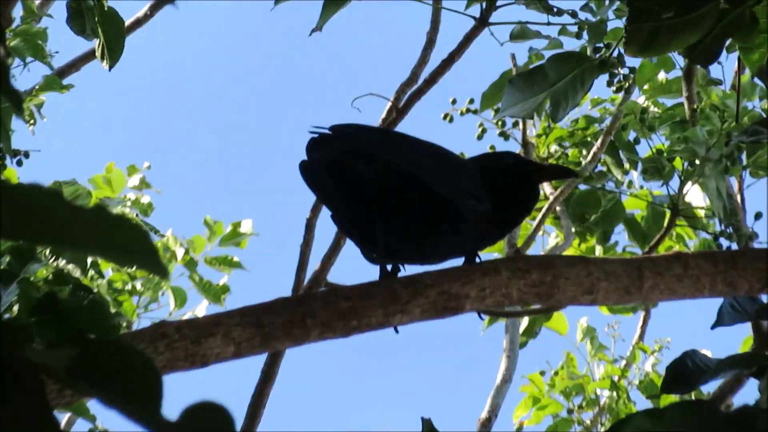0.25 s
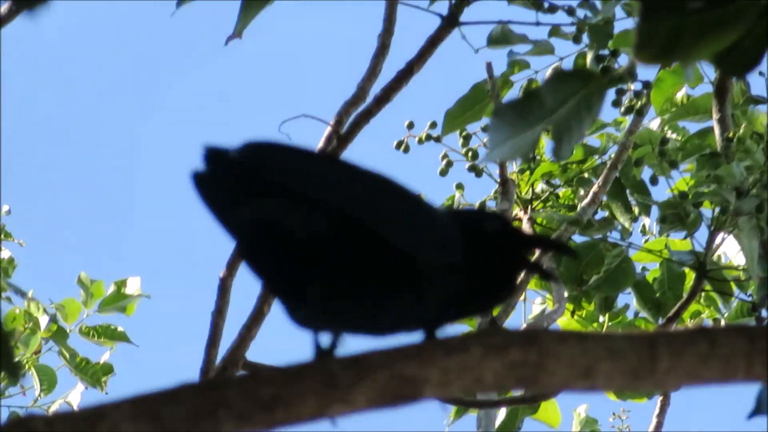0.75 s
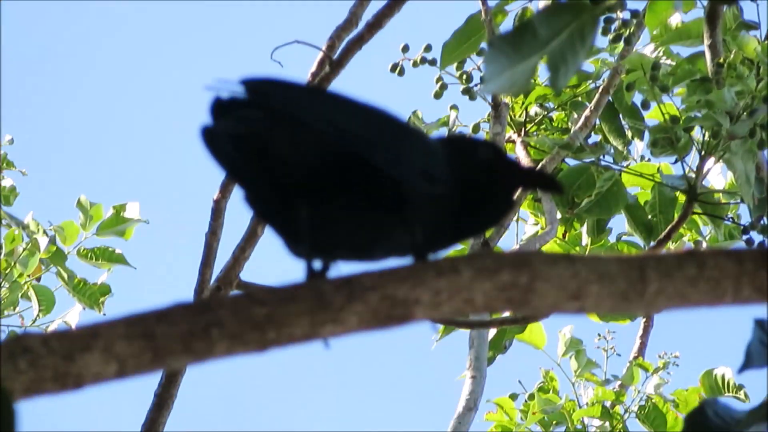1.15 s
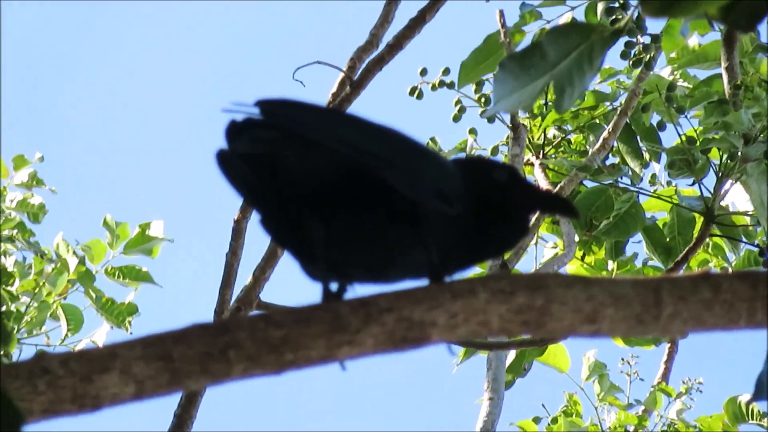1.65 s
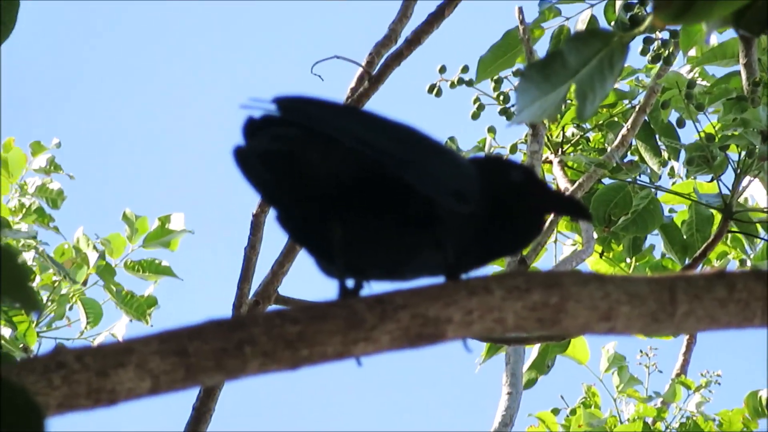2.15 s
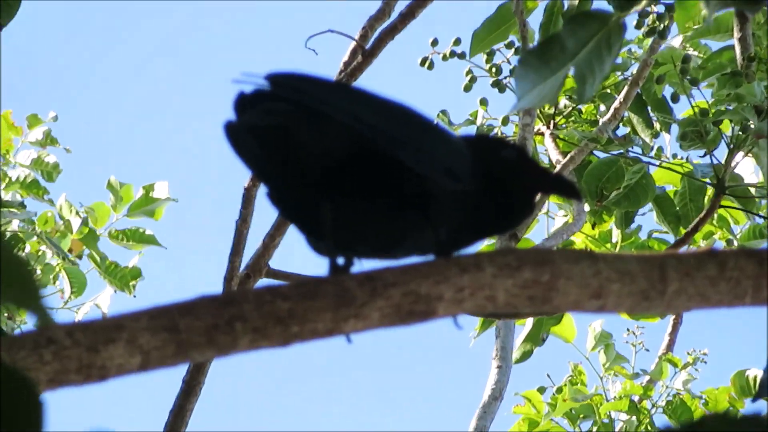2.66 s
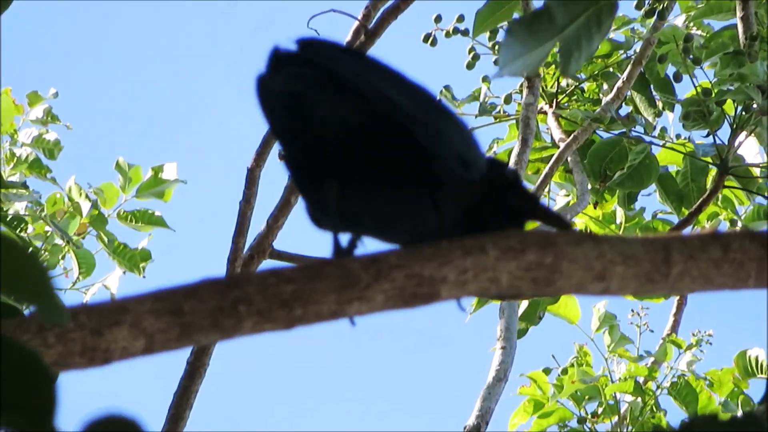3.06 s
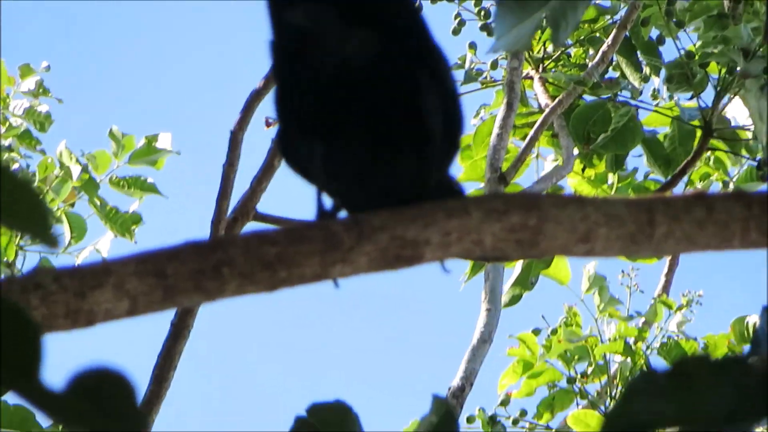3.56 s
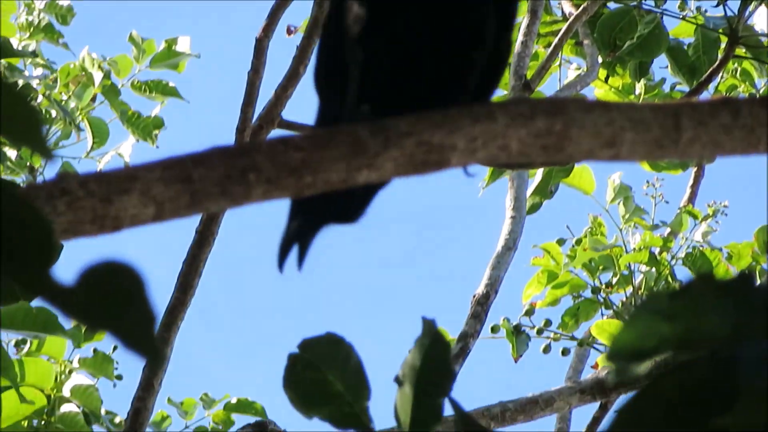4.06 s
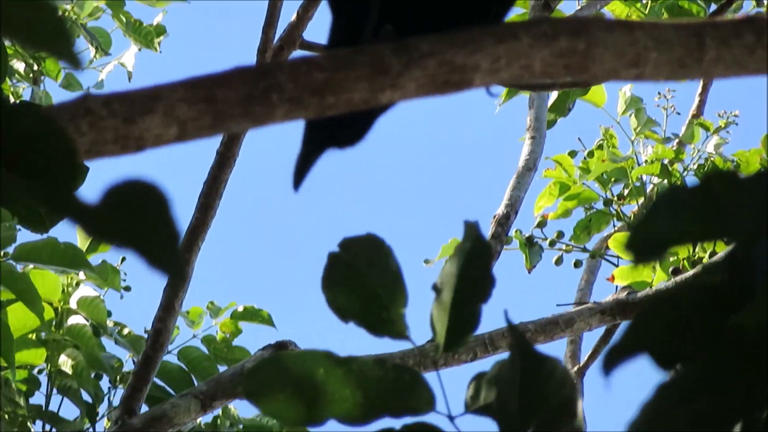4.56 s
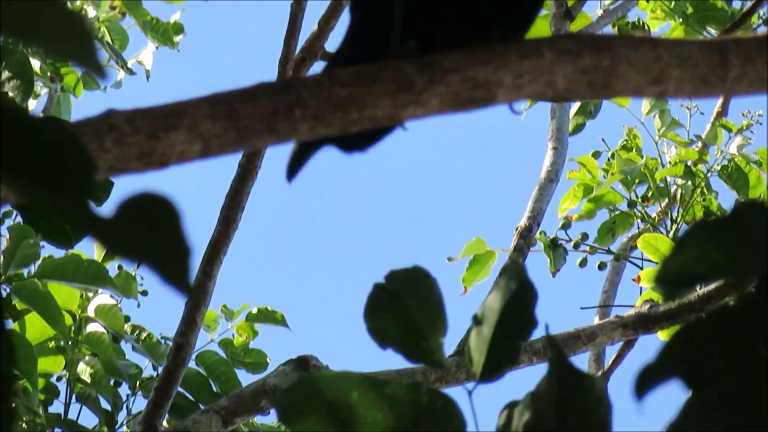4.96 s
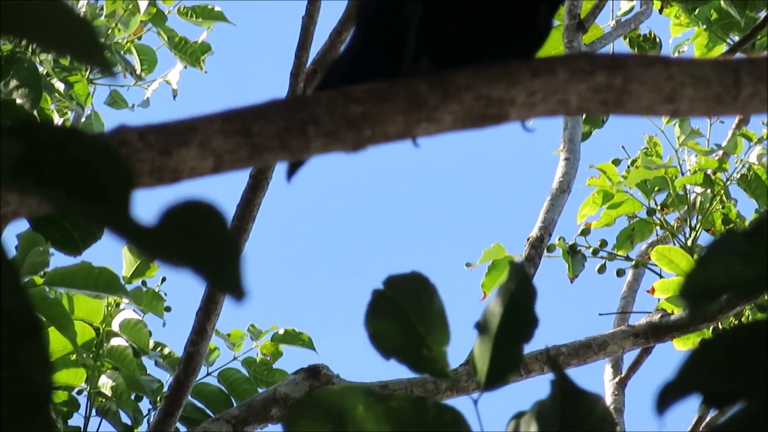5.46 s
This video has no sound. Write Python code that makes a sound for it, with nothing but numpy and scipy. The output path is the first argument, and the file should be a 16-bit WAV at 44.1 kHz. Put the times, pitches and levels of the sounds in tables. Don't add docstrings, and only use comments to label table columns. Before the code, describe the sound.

A crow overhead gives one harsh caw, then a run of five, while a small bird whistles and distant traffic washes by.

```python
import sys
import numpy as np
from scipy import signal
from scipy.io import wavfile
from scipy.ndimage import uniform_filter1d

SR = 44100
rng = np.random.default_rng(int(sys.argv[2]) if len(sys.argv) > 2 else 0)


def boost(x):
    u = np.asarray(x, float) / 20
    return 10 ** u


def dump_mix(stems):
    frames = np.atleast_2d(stems).T
    limited = np.clip(frames, -1, 1)
    pcm = np.round(limited * 32767).astype(np.int16)
    wavfile.write(sys.argv[1], SR, pcm)


N = 251370


def evened(x):
    return x / np.sqrt(np.mean(x ** 2) + 1e-20)


def read(points, hz):
    f, value = np.transpose(points)
    return np.interp(np.log(hz + 1), np.log(f + 1), value)


def add(mix, s, sound):
    part = mix[max(round(s * SR), 0):][:len(sound)]
    part += sound[:len(part)]


def resonate(x, hz, width_hz):
    turn = np.exp(2j * np.pi * np.cumsum(hz * np.ones(len(x))) / SR)
    r = np.exp(-np.pi * width_hz / SR)
    return 2 * (turn * signal.lfilter([1 - r], [1, -r], x / turn + 1e-18)).real


def wander(count, size):
    return evened(uniform_filter1d(uniform_filter1d(rng.standard_normal(count), size), size))


# (f/Hz, level/dB per Hz)
ROAD_COLOUR = [(15, -38), (25, -7.5), (59, -8.5), (107, -3.5), (209, -5.5), (322, -12), (445, -11),
               (582, -18.5), (919, -18.5), (1080, -21.5), (1270, -22.5), (3260, -29), (6730, -35.5),
               (15500, -49)]
# (t/s, level/dB)
ROAD_PASSING = [(0.0, -66), (0.63, -67.5), (0.83, -65.5), (1.3, -57.5), (1.7, -59), (2.2, -59), (2.55, -59),
                (3.0, -57), (4.2, -57), (5.7, -55.5)]
# (f/Hz, likeness/-1 to 1)
ROAD_LIKENESS = [(60, 0.97), (130, 1), (290, 0.82), (640, 0.67), (1410, 0.61), (3100, 0.17), (6820, 0.14),
                 (15000, -0.38)]


def traffic():
    frames, hz = N // 256 + 5, np.fft.rfftfreq(1024, 1 / SR)
    a, b, c, d, patches = rng.standard_normal((frames, 513, 5)).T
    patches = evened(uniform_filter1d(uniform_filter1d(patches, 10, 0), 14, 1))
    s, road_db = np.transpose(ROAD_PASSING)
    road_db = np.interp(np.arange(frames) * 256 / SR, s, road_db - road_db.mean())
    hum_db = 1.35 * wander(frames, size=40) + 2 * np.linspace(1, -1, frames)
    road_share = read([(480, 0), (560, 0.92), (2500, 0.53), (8000, 0.37)], hz)[:, None]
    hum_share = read([(120, 0.23), (260, 0.62), (480, 0.4), (560, 0.6)], hz)[:, None]
    same = np.clip(read(ROAD_LIKENESS, hz), -1, 1)[:, None]
    left = a + 1j * b
    right = same * left + np.sqrt(1 - same ** 2) * (c + 1j * d)
    level_db = read(ROAD_COLOUR, hz)[:, None] + 0.94 * patches
    level_db = level_db + road_share * road_db + hum_share * hum_db
    z = np.array([left, right]) * boost(level_db)
    return boost(-43.5) * evened(signal.istft(z, nperseg=1024, noverlap=768)[1][:, :N])


# (t/s, peak level/dB, f/Hz, length/cycles)
HAND_THUMPS = [(0.039, -41, 43, 1.1), (0.299, -56, 110, 2.1), (0.569, -34.5, 118, 1.7),
               (0.729, -49, 62, 0.93), (1.078, -45, 75, 1.1), (1.348, -35, 43, 0.95),
               (1.489, -28, 120.7, 0.44), (1.811, -41, 70, 2), (1.919, -39, 35.5, 0.93),
               (2.238, -37, 41, 0.99), (2.319, -34.5, 67.4, 1.3), (2.399, -28.5, 54, 1.56),
               (2.689, -28, 85, 2.1), (2.734, -28.5, 58.5, 1.1), (2.779, -34, 70, 0.77),
               (2.888, -32.5, 66.6, 0.99), (3.07, -29.5, 48.7, 1.37), (3.328, -31.5, 47.8, 1.56),
               (3.509, -32.5, 50.4, 1), (3.6, -33.5, 64, 0.7), (3.949, -38, 38, 1.01),
               (4.399, -46, 38, 1.01), (4.798, -45, 89, 1.01), (5.27, -42.5, 26.7, 0.84),
               (5.409, -36, 30, 0.57)]


def hand_thumps():
    hand = np.zeros(N)
    for s, db, hz, cycles in HAND_THUMPS:
        t = np.arange(0, 2 * max(cycles, .5) / hz, 1 / SR)
        add(hand, s - .005, boost(db) * np.sin(2 * np.pi * hz * t) * np.hanning(len(t)))
    tilt = 0.2 * wander(N, size=9000)
    return hand + tilt * np.roll(hand, 110) * [[1], [-1]]


# (swell level/dB, swell t/s, droop level/dB, release level/dB)
EFFORT_BY_POSE = [(-15, 0.098, -4, -4), (-14, 0.083, -4.5, -6), (-11, 0.082, 1.5, -12),
                  (-12, 0.071, -2, -9)]
# (first shut f/Hz, first open f/Hz, closing share/0-1, second shut f/Hz, second open f/Hz)
THROAT_BY_POSE = [(1036, 1267, 0.18, 1826, 1983), (1021, 1252, 0.12, 1790, 2037),
                  (1054, 1166, 0.56, 1610, 1778), (1072, 1212, 1, 1580, 1707)]
GRIT_BY_POSE = [(.3, -0.081, 0.06, 0.1), (.22, .22, 0.06, 0.53), (0.31, 0.13, 0.22, 0.32),
                (.25, .22, 0.16, .35)]
# (rasp level/dB, early rasp level/dB, late rasp level/dB, breath level/dB, early breath level/dB)
TREBLE_BY_POSE = [(-10, -6.5, -10.5, -38, -10), (-11, 2, -16, -34, 20), (-11, -1, -11, -34.5, 19),
                  (-12, -3, -10, -31.5, 12.5)]


def gesture(pose, start, length, peak_db, top_hz, last_hz):
    start_hz, rise_s, rise_curve, sag_from = 148.34, .115, 1.5, .62
    snap_db, snap_s, release_s = -15, 0.0087, .035
    t = np.linspace(0, length, 40)
    rise = np.sin(np.pi / 2 * np.minimum(t / rise_s, 1)) ** rise_curve
    sag = np.clip((t / length - sag_from) / (1 - sag_from), 0, 1) ** 1.5
    late = np.sqrt(sag)

    swell_db, swell_s, droop_db, release_db = EFFORT_BY_POSE[pose]
    effort_db = peak_db + snap_db * np.exp(-t / snap_s)
    effort_db += swell_db * np.maximum(1 - t / swell_s, 0) ** 1.6
    effort_db += droop_db * sag + release_db * np.maximum(1 - (length - t) / release_s, 0)
    hz = start_hz + (top_hz - start_hz) * rise + (last_hz - top_hz) * sag

    low_shut, low_open, closes, mid_shut, mid_open = THROAT_BY_POSE[pose]
    low_hz = low_shut + (low_open - low_shut) * (rise - closes * sag)
    mid_hz = mid_shut + (mid_open - mid_shut) * (rise - sag)
    hoarse, late_hoarse, double, late_double = GRIT_BY_POSE[pose]
    hoarse = hoarse + late_hoarse * late
    double = double + late_double * late
    rasp_db, early_rasp_db, late_rasp_db, breath_db, early_breath_db = TREBLE_BY_POSE[pose]
    rasp_db = rasp_db + early_rasp_db * (1 - rise) + late_rasp_db * sag
    breath_db = breath_db + early_breath_db * (1 - rise) ** 2
    return np.transpose([start + t, effort_db, hz, low_hz, mid_hz, hoarse, double, rasp_db, breath_db])


def steep(x, hz, width_hz):
    return resonate(resonate(x, hz, 1.44 * width_hz), hz, 1.43 * width_hz)


def steady(x):
    return x / np.sqrt(uniform_filter1d(x ** 2, 2500) + 1e-9)


# (f/Hz, width f/Hz, level/dB)
SHUT_BEAK = [(3560, 220, -12.5), (6540, 230, -25.5), (9240, 290, -25)]


def caw(rows, balance, upper, air_bands):
    s, *columns = np.transpose(rows)
    t = np.arange(s[0], s[-1], 1 / SR)
    effort_db, hz, low_hz, mid_hz, hoarse, double, rasp_db, breath_db = (np.interp(t, s, c) for c in columns)
    mid_db, chest_db, body_db, fill_db, hiss, notch_hz, low_width_hz, mid_width_hz, held = balance
    hoarse, double = np.clip(hoarse, 0, 1), np.clip(double, 0, .9)

    turns = np.cumsum(hz * (1 + .05 * hoarse * wander(len(t), size=120))) / SR
    beat = turns + .08 * double * np.sin(np.pi * turns)
    cycle = (beat + .5).astype(int)
    uneven = np.clip(rng.standard_normal(200), -2.5, 1.3)[cycle]
    strength = boost(4 * hoarse * uneven) * (1 + double * (-1.) ** cycle)
    pulses = sum(np.cos(2 * np.pi * k * beat) for k in range(1, 68))
    puffs = (.2 + np.exp(-(beat % 1) / .35)) * rng.standard_normal(len(t))
    clear = strength * evened(pulses)
    air = strength ** 0.14 * evened(puffs)
    low = clear + .7 * hoarse * air
    high = clear + hiss * (1 + 2 * hoarse) * air

    mid_gain = boost(mid_db + 0.25 * (effort_db - effort_db.max()))
    voice = steep(low, low_hz, low_width_hz) - mid_gain * steep(low, mid_hz, mid_width_hz)
    voice += boost(body_db) * steep(low, (low_hz + mid_hz) / 2, 180)

    ladder = 0
    for k in range(2, 6):
        partial_db = 5.5 * wander(len(t), size=700) - 2 * k * (hz / hz.max()) ** 4
        ladder = ladder + boost(partial_db) * np.cos(2 * np.pi * k * turns)
    ladder = evened(ladder) * strength ** .5 * (1 - double) ** 1.36
    voice += boost(chest_db) * steep(0.44 * ladder + 0.23 * clear, 928, 734)

    beak = (low_hz / low_hz.max()) ** 0.62
    top = sum((-1) ** k * boost(db) * steep(high, f * beak, w) for k, (f, w, db) in enumerate(upper))
    top += boost(fill_db) * steep(high, 2130, 1920)
    top -= resonate(top, np.linspace(1.03, .98, len(t)) * notch_hz, 330)
    shut = np.clip(held, 0, 1) / (1 + np.exp((t - t[0] - .065) / 0.0069))
    shut_top = sum(boost(db) * steep(high, f, w) for f, w, db in SHUT_BEAK)
    top = (1 - shut) * top + shut * shut_top

    breath = sum(boost(db) * steep(air + 0.079 * clear, f, w) for f, w, db in air_bands)
    voice = steady(voice) + boost(rasp_db) * steady(top)
    voice += boost(breath_db - 4.5) * steady(breath)
    return s[0], boost(effort_db - 1.5) * voice * signal.windows.tukey(len(t), .1)


# (t/s, length t/s, effort level/dB, top pulse f/Hz, last pulse f/Hz)
CAW_CALLS = [
    (0.816, 0.19, -23, 206.5, 176.6),
    (2.95, 0.2, -24.5, 218.7, 197.3),
    (3.512, .187, -24, 219, 177.4),
    (4.071, 0.19, -22.5, 217.5, 181.4),
    (4.475, .195, -21, 227.7, 204.7),
    (4.903, .194, -21, 227.8, 204.4),
]
HEAD_POSE = [
    0,
    1,
    1,
    2,
    3,
    3,
]
# (second resonance level/dB, chest level/dB, body level/dB, broad fill level/dB, hiss share/0-1)
BALANCE_BY_POSE = [
    (2, -20, -11, -24, 0.95),
    (-4.5, -21, -13.5, -25, 0.83),
    (-3.5, -18.5, -10.5, -27.5, 0.97),
    (-3.5, -20.5, -14, -27.5, 0.73),
]
# (notch f/Hz, first low width f/Hz, second low width f/Hz, treble held back/0-1)
BEAK_BY_POSE = [
    (6560, 215, 136, 0.75),
    (6450, 209, 230, 0.22),
    (6870, 170, 184, .05),
    (7150, 178, 177, .2),
]
# (f/Hz, width f/Hz, level/dB)
UPPER_BY_CAW = [
    [(3680, 160, -15.5), (4250, 490, -15.5), (5280, 420, -20), (7140, 510, -20.5), (8540, 980, -29)],
    [(3320, 260, -27), (3730, 120, -17), (4190, 320, -12.5), (5500, 570, -23.5), (7250, 730, -20),
     (9100, 780, -32.5)],
    [(3060, 230, -54), (3940, 110, -16.5), (4330, 170, -11), (5670, 720, -26), (7340, 420, -23),
     (9000, 1150, -34)],
    [(2430, 310, -27), (3400, 178, -10), (3800, 810, -28), (6270, 910, -24.5), (7830, 870, -31),
     (9170, 320, -29.5)],
    [(2500, 190, -34), (3350, 430, -17.5), (3900, 470, -28.5), (5800, 730, -20.5), (7670, 1000, -32),
     (9400, 720, -38)],
    [(2480, 240, -26), (3346, 220, -12.5), (3830, 410, -26.5), (5890, 990, -21.5), (8000, 1130, -32),
     (9080, 550, -31.5)],
]
# (f/Hz, width f/Hz, level/dB)
BREATH_BANDS = [
    [(10100, 730, 7), (12100, 1200, -3), (13700, 900, -9)],
    [(10000, 1900, 6.5), (12300, 1200, -6), (13800, 720, -20)],
]


def crow_calls():
    crow = np.zeros(N)
    for row, pose, upper in zip(CAW_CALLS, HEAD_POSE, UPPER_BY_CAW):
        balance = (*BALANCE_BY_POSE[pose], *BEAK_BY_POSE[pose])
        add(crow, *caw(gesture(pose, *row), balance, upper, BREATH_BANDS[pose // 2]))
    return signal.sosfilt(signal.butter(4, 13800, fs=SR, output="sos"), crow)


def leaves(x):
    taps = rng.standard_normal(300) * boost(-60 * np.arange(300) / 300)
    scattered = signal.oaconvolve(x, taps / np.linalg.norm(taps))[:N]
    treble = signal.lfilter(*signal.butter(2, 6500, "high", fs=SR), scattered)
    return x + boost(-5) * np.array([treble, -treble])


# (f/Hz, t/s)
YARD_DECAY = [(500, 1.2), (1800, 1.113), (5000, 1.03), (10000, 0.9)]


def tail(spread):
    taps = np.zeros((2, 60000))
    at = np.arange(500, 59980, 20) + rng.integers(0, 20, (2, 2974))
    np.put_along_axis(taps, at, rng.choice([-1., 1.], at.shape), 1)
    hz, t, z = signal.stft(taps, SR, nperseg=256)
    z = z * boost(-60 * t / read(YARD_DECAY, hz)[:, None]) * np.minimum(t / 0.054, 1)
    colour = [(500, -2.0), (1000, -10), (1300, 1.0), (1900, 0.0), (4000, -1), (6000, 3.0), (10000, -1.0)]
    z *= boost(read(colour, hz))[:, None]
    side = read(spread, hz)[:, None] * z[1]
    out = signal.istft(np.array([z[0] + side, z[0] - side]), SR, nperseg=256)[1]
    return out / np.linalg.norm(out[0])


# (delay t/s, level/dB)
YARD_ECHOES = [(.011, 0.5), (.024, -7), (.047, -12.5), (.075, -16), (.12, -17.5)]


def yard(x, spread=((300, .1), (1500, .12), (4000, .4), (10000, .9)), turns_per_s=3.0):
    echoes = np.zeros(SR // 4)
    for delay, db in YARD_ECHOES:
        echoes[round(delay * SR)] += boost(db)
    thin = signal.sosfilt(signal.butter(2, 900, "high", fs=SR, output="sos"), x)
    late = np.roll(x, round(.17 * SR))
    ring = boost(-5) * resonate(late, 1305, 3.5)
    out = (signal.fftconvolve(thin, echoes)[:N] + ring) * np.ones((2, 1))
    for k in range(3):
        share = np.sqrt(2 / 3) * np.cos(np.pi * (turns_per_s * np.arange(N) / SR + k / 3))
        out += boost(-5) * signal.fftconvolve((x * share)[None], tail(spread), axes=1)[:, :N]
    return out


# (t/s, length t/s, f/Hz, width f/Hz, level/dB)
BIRD_PATCHES = [(1.11, .075, 4620, 260, -54), (1.2, .15, 13500, 2000, -79), (1.36, 0.133, 2300, 1300, -53.5),
                (2.76, 0.07, 4600, 2100, -51), (2.78, 0.22, 14200, 1500, -74), (3.1, 0.19, 9500, 2500, -81),
                (4.73, .07, 4680, 330, -52), (4.8, .12, 14000, 1500, -76), (5.22, 0.246, 5850, 400, -63),
                (5.55, 0.15, 3100, 590, -58)]


def chatter():
    bird = np.zeros(N)
    for s, length, hz, width_hz, db in BIRD_PATCHES:
        t = np.arange(0, length, 1 / SR)
        buzz = rng.standard_normal(len(t)) * (1 + 0.16 * np.cos(2 * np.pi * 70 * t))
        buzz = evened(resonate(resonate(buzz, hz, width_hz), hz, width_hz))
        add(bird, s, boost(db) * buzz * signal.windows.tukey(len(t), .2))
    return bird


def glide(shape, start, length, first_hz, last_hz, db):
    crest, start_db, end_db, flat = shape
    u = np.linspace(0, 1, 30)
    hz = first_hz + (last_hz - first_hz) * np.minimum(u / flat, 1)
    level_db = db + np.interp(u, [0, crest, 1], [start_db, 0, end_db])
    return np.transpose([start + length * u, hz, level_db])


def whistle(rows):
    s, hz, level_db = np.transpose(rows)
    t = np.arange(s[0], s[-1], 1 / SR)
    wavering_hz = np.interp(t, s, hz) * (1 + .003 * wander(len(t), size=80))
    tone = np.sqrt(2) * np.sin(2 * np.pi * np.cumsum(wavering_hz) / SR)
    flutter_db = 4.0 * wander(len(t), size=150)
    return s[0], boost(np.interp(t, s, level_db) + flutter_db) * tone * signal.windows.tukey(len(t), .3)


# (t/s, length t/s, first f/Hz, last f/Hz, level/dB)
CHIRP_CALLS = [(1.183, .045, 5150, 5750, -55), (1.22, .07, 3880, 5050, -44), (1.28, .04, 4950, 5550, -55),
               (1.32, .06, 5650, 6600, -66), (2.762, .025, 5450, 5450, -56), (2.822, .025, 4500, 4750, -53),
               (2.838, .035, 5950, 6100, -53), (2.85, .04, 3950, 4350, -50), (2.94, .03, 4750, 5700, -56),
               (2.875, .055, 6450, 6800, -65), (4.822, .03, 5340, 5360, -47), (4.862, .04, 3980, 4450, -48),
               (5.058, .035, 3480, 3950, -46)]
# (t/s, length t/s, first f/Hz, last f/Hz, level/dB)
SWOOP_CALLS = [
    (1.29, .225, 2600, 4640, -38),
    (2.885, .06, 4330, 4720, -45),
    (4.895, .05, 4480, 4780, -42),
    (5.08, .07, 3850, 4350, -42),
]
# (crest/share of length, start level/dB, end level/dB, glide levels off/share of length)
CHIRP_CURVE = (.4, -6, -9, 1)
SWOOP_CURVE = (.82, -17, -3, .88)


def small_bird():
    bird = np.zeros(N)
    for shape, rows in ((CHIRP_CURVE, CHIRP_CALLS), (SWOOP_CURVE, SWOOP_CALLS)):
        for row in rows:
            add(bird, *whistle(glide(shape, *row)))
    return bird


def scene():
    road, hand = traffic(), hand_thumps()
    crow = crow_calls()
    birds = chatter() + small_bird()
    direct = leaves(crow) + birds * boost([[.8], [-.8]])
    return direct + yard(crow + boost(-2.0) * birds) + road + hand


def band_limit(x):
    return signal.sosfilt(signal.butter(12, 15670, fs=SR, output="sos"), x)


def record(dry):
    return band_limit(dry)


dry = scene()
out = record(dry)
dump_mix(out)
```